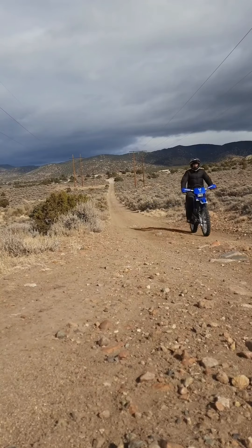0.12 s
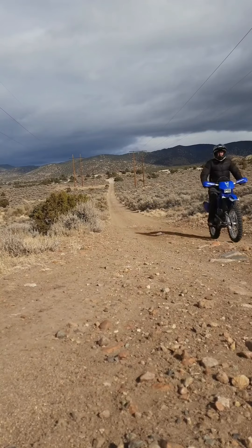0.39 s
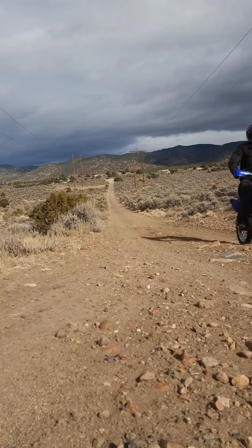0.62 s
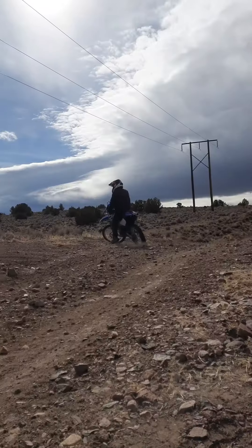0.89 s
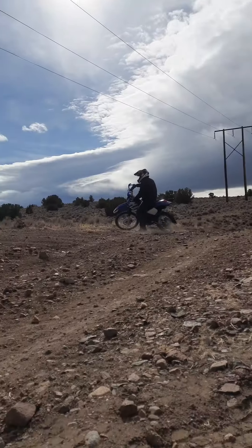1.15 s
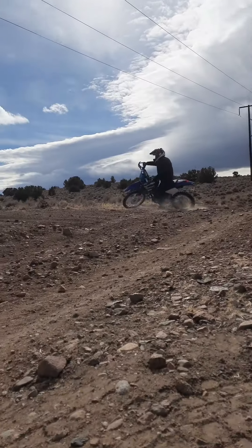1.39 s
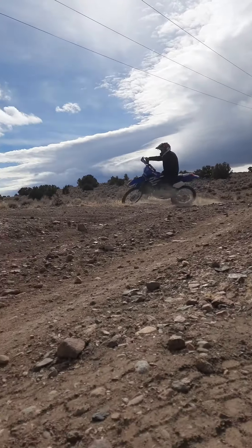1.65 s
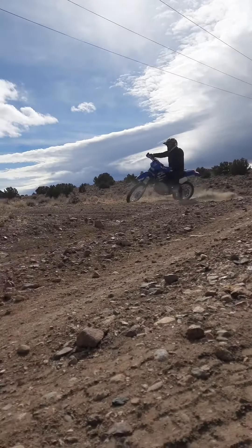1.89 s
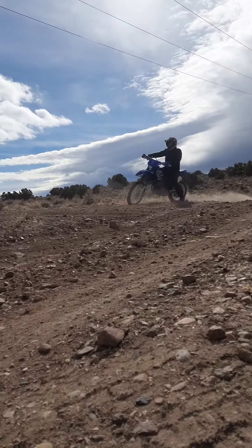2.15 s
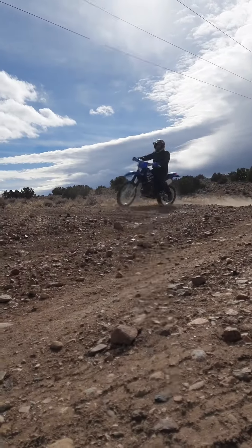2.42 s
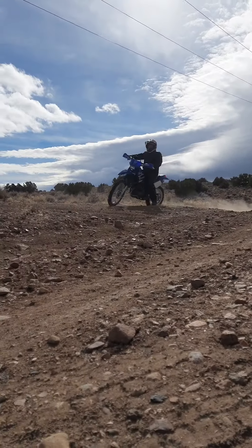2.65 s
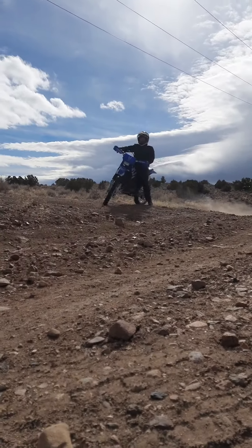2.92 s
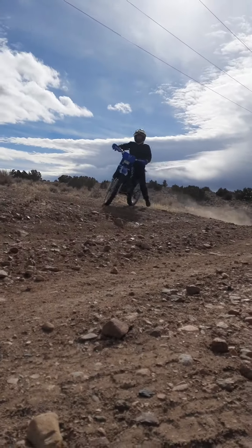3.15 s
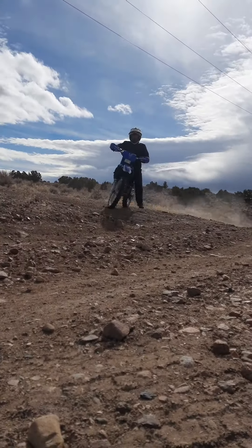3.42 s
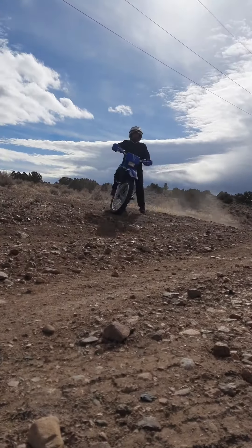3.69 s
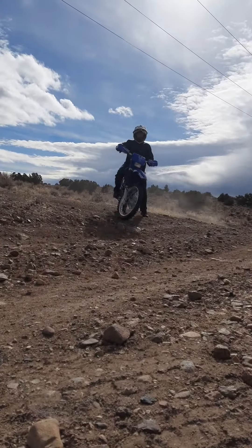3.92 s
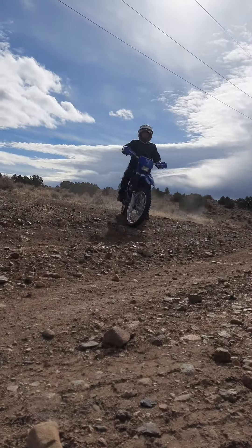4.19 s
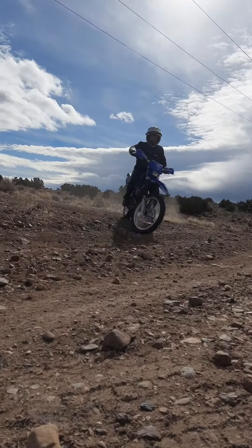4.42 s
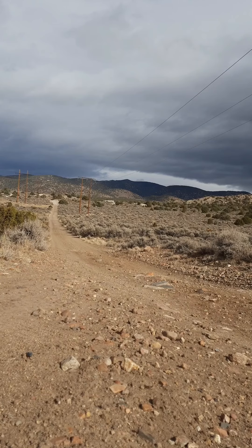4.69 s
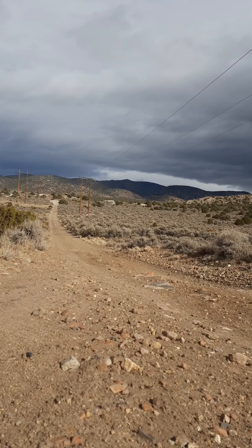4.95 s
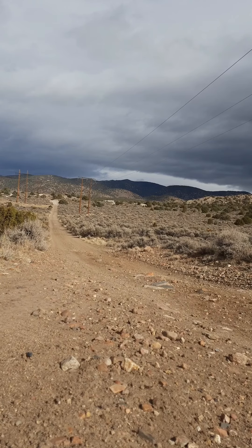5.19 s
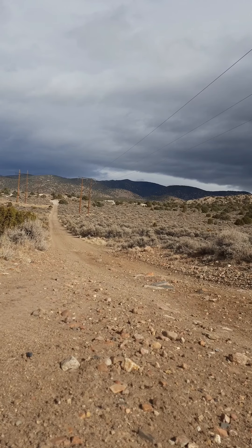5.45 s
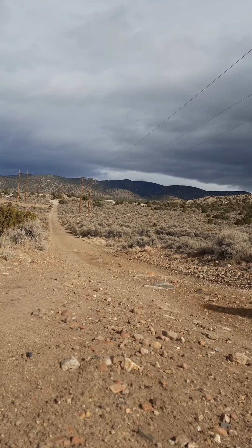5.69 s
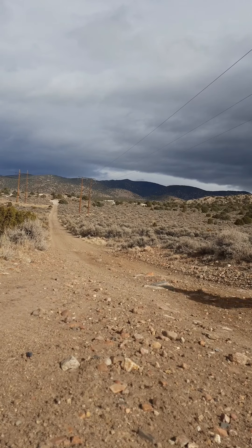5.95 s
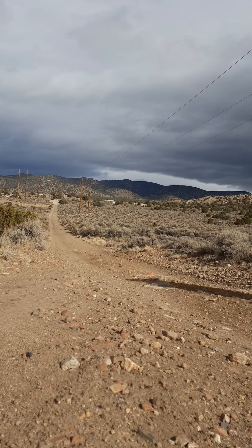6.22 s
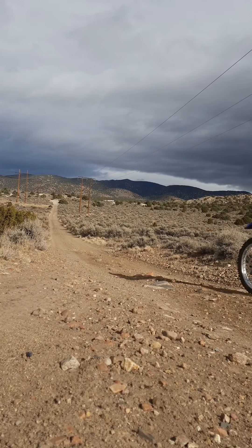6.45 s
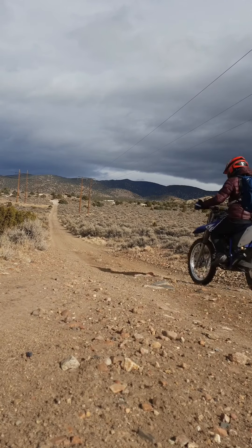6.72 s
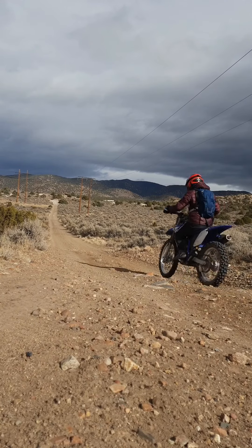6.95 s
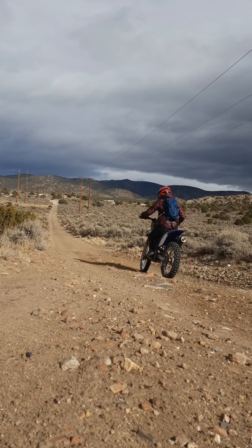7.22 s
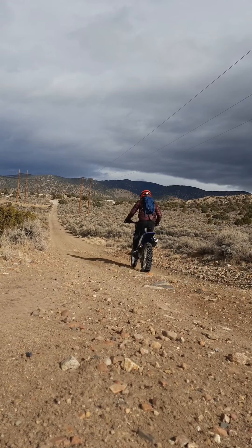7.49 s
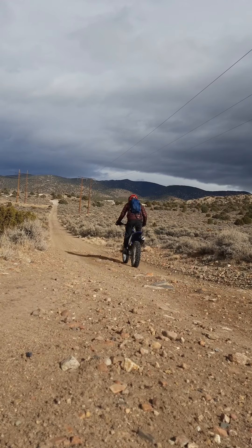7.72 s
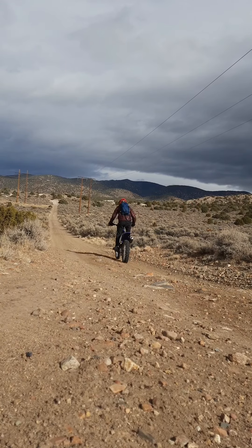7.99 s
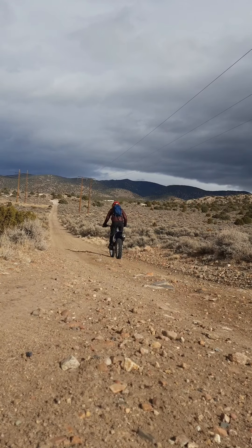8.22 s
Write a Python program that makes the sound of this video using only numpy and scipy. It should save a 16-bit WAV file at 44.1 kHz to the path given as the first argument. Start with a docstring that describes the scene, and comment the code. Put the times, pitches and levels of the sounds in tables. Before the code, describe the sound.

A single-cylinder dirt bike putters faintly, revs hard through a gravel turn, coasts in gusty wind, then chugs past close by and rides away.

```python
"""A single-cylinder four-stroke dirt bike on a gravel trail, in three shots cut together: it rolls up,
it revs round a turn and coasts, it chugs past close by and rides off. Every firing strikes the modes of
the exhaust pipe and further resonances; clatter and tyre hiss are noise swelling with the gas rush.
Chain and brake squeak in thin tones; gusts, lumpy low noise, buffet the two microphone ports."""
import sys
import numpy as np
from scipy import signal
from scipy.fft import rfft, irfft
from scipy.io import wavfile
from scipy.ndimage import uniform_filter1d, map_coordinates

SR = 44100
rng = np.random.default_rng(int(sys.argv[2]) if len(sys.argv) > 2 else 0)


def how_loud(loudness_db):
    """Turn decibels into a plain amplitude multiplier (0 dB gives 1, 20 dB gives 10)."""
    steps = np.asarray(loudness_db, float) / 20
    return 10 ** steps


def unload_audio(sound):
    """Save the sound as a 16-bit wav file, at the path given as the first command line argument."""
    columns = np.transpose(np.atleast_2d(sound))
    # keep every value between -1 and 1, then stretch to whole-number steps
    steps = np.round(np.clip(columns, -1, 1) * 32767)
    wavfile.write(sys.argv[1], SR, steps.astype(np.int16))


N = 368543
T = np.arange(N) / SR


def evened(x):
    """Scales to rms 1."""
    return x / np.sqrt(np.mean(x ** 2) + 1e-20)


def smoothed(x, samples):
    """Two running means, one after the other."""
    return uniform_filter1d(uniform_filter1d(x, samples), samples)


def curve(rows, t=T):
    """Joins rows (s, values) by straight lines."""
    s, *columns = np.transpose(rows)
    return np.squeeze([np.interp(t, s, c) for c in columns])


def coloured(x, gain):
    """Filters x by gain(hz)."""
    hz = np.fft.rfftfreq(x.shape[-1], 1 / SR) + 1
    return irfft(rfft(x) * gain(hz), x.shape[-1])


def ring(hz, t60):
    """One dying mode, of energy 1."""
    t = T[:SR // 5]
    mode = how_loud(-60 * t / t60) * np.sin(2 * np.pi * hz * t)
    return mode / np.linalg.norm(mode)


def ringing(x, hz, t60):
    """A dying mode of energy 1 whose pitch may move, struck by x."""
    turn = np.exp(2j * np.pi * np.cumsum(hz) / SR)
    r = 1000 ** (-1 / (t60 * SR))
    return np.sqrt(2 * (1 - r ** 2)) * (turn * signal.lfilter([1], [1, -r], x / turn)).imag


def delayed(x, samples):
    """Reads x a changing number of samples late."""
    return map_coordinates(x, [np.arange(len(x)) - samples], order=3, mode="nearest")


# Bike level as it nears and leaves, before ground and ports, a table a shot: time_s, exhaust_db, clatter_db
BIKE_LEVEL = [
    [(0, -48, -49.5), (.55, -40, -42.5), (.79, -41.5, -38.5)],
    [(.79, -27.5, -45.5), (1.12, -27, -46), (1.45, -28.5, -44), (1.75, -23, -40.5), (2.26, -27.5, -40),
     (2.32, -35.5, -39), (2.4, -24, -41), (2.51, -29, -42.5), (2.72, -25.5, -44.5), (2.98, -32, -46.5),
     (3.4, -38, -52.5), (4.07, -37, -53.5), (4.24, -37, -42.5), (4.36, -30, -50.5), (4.54, -53, -49)],
    [(4.54, -33, -50.5), (4.98, -29, -47), (5.06, -23.5, -41), (5.8, -23.5, -41.5), (6.47, -19, -36.5),
     (6.7, -28.5, -40.5), (6.95, -25, -41), (7.3, -26.5, -44), (7.5, -37.5, -47), (8.36, -47, -50)],
]
# Engine speed, one table a shot: time_s, firings_per_s
ENGINE_SPEED = [
    [(0, 24.3), (.79, 24.3)],
    [(.79, 21.92), (.97, 23.51), (1.2, 24.34), (1.5, 31.35), (1.75, 34.74), (2, 35.07), (2.26, 33.02),
     (3, 27.87), (4.54, 27)],
    [(4.54, 20.07), (4.6, 19.4), (4.9, 16.21), (5.1, 19.37), (5.75, 21.79), (6.2, 24.79), (6.47, 27.41),
     (6.75, 25.01), (7.05, 23.86), (7.4, 24.45), (8.36, 23.6)],
]
# One firing in each shot, from which the others are counted: time_s
A_FIRING_S = [.561, 1.078, 5.145]
# Exhaust modes, a row a shot: boom_t60_s, boom_lag_s (after the firing), bark_hz, bark_t60_s,
# echo_s (along the pipe), echo_share
PIPE_MODES = [(0.22, 0.00375, 430, 0.02, 0.0113, 0.19), (0.1, 0.00382, 239, 0.012, 0.0108, 0.44),
              (0.086, 0.00787, 293.4, 0.034, 0.00855, 0.99)]
# Clatter colour, relative, one table a shot: pitch_hz, gain_db
CLATTER_COLOUR = [
    [(520, 22), (1000, 4), (2500, -5.5), (6000, -6), (9500, -16)],
    [(550, 22), (1050, -0.5), (2500, 0.5), (6300, -3.5), (8300, -17), (10000, -12.5), (11500, -15)],
    [(520, 16.5), (1500, -3.5), (2400, -9), (3900, -13), (6600, -14), (8000, -13), (9300, -25),
     (10000, -51)],
]
BARK_DB = (2.5, -5.5, -7.5)  # the pipe's bark against its boom, throttle open, at mean level: one a shot


def bike():
    """The three shots end to end: exhaust, and engine noise in three unrelated strands."""
    exhaust, engine = np.zeros(N), np.zeros((3, N))
    for shot in zip(BIKE_LEVEL, ENGINE_SPEED, A_FIRING_S, PIPE_MODES, CLATTER_COLOUR, BARK_DB):
        first, low, high = bike_shot(*shot)
        exhaust[first:first + len(low)] = low
        engine[:, first:first + len(low)] = high
    return exhaust, engine


def bike_shot(levels, speed, firing_s, pipe, colour, bark_db):
    """Each firing strikes the pipe and lets out gas; returns first sample, exhaust, engine noise."""
    first = round(speed[0][0] * SR)
    t = T[first:round(speed[-1][0] * SR)]
    rate = curve(speed, t)
    boom_db, clatter_db = curve(levels, t)
    shut = 1 - throttle(t)
    turns, luck, strength, blows = firings(t, rate, shut, firing_s)
    exhaust = exhaust_pipe(t, blows, boom_db, bark_db, shut, luck, pipe)
    rush = gas_rush(t, turns, rate, strength, luck, shut)
    exhaust += rings_and_gas_bands(t, blows, rush, clatter_db, shut, luck)
    return first, exhaust, clatter_and_tyres(t, rush, clatter_db, colour)


# The throttle is held open: start_s, end_s
THROTTLE_OPEN = [(.82, 2.3), (4.54, 6.6), (6.92, 7.42)]


def throttle(t):
    """Opening of the throttle, 0 shut to 1 open, with a short ramp for the twist of the grip."""
    twist_s = .06  # time to open or shut it
    return sum(np.clip(np.minimum(t - start, end - t) / twist_s + .5, 0, 1) for start, end in THROTTLE_OPEN)


# Firings much stronger or weaker than their neighbours: time_s (within the cycle), strength_db
ODD_FIRINGS = [(5.835, 1.5), (5.885, -8.5), (6.72, 4), (6.76, -4), (6.795, 7), (7.755, 10)]


def firings(t, rate, shut, firing_s):
    """Counts firings from the engine speed; with the throttle shut they stumble and differ more."""
    uneven_open_db, uneven_shut_db = 1.9, 5
    stumble = .13  # scale of the wander of the firing moment when shut (cycles)
    turns = np.cumsum(rate) / SR
    turns -= np.interp(firing_s, t, turns)
    turns += stumble * shut * evened(smoothed(rng.standard_normal(len(t)), 2000))
    cycle = np.floor(turns - np.floor(turns[0])).astype(int)
    luck = np.clip(rng.standard_normal((200, 3)), -2, 2)[cycle]  # three draws a firing
    spread = np.interp(shut, (0, 1), (uneven_open_db, uneven_shut_db))
    strength = how_loud(spread * luck[:, 0] - .1 * spread ** 2)  # mean power stays about the same
    for s, db in ODD_FIRINGS:
        if t[0] < s < t[-1]:
            strength[cycle == cycle[round((s - t[0]) * SR)]] = how_loud(db)
    blows = np.diff(cycle, prepend=cycle[0]) * strength * np.sqrt(SR / rate)
    return turns, luck, strength, blows


# The pipe's boom mode shifts with the heat and flow of the gas: time_s, pitch_hz
BOOM_HZ = [(1.25, 128), (1.7, 93), (2.3, 100.6), (2.75, 94), (4.55, 94), (6.5, 122), (6.65, 96.5), (7, 119),
           (7.4, 112), (7.55, 96)]


def exhaust_pipe(t, blows, boom_db, bark_db, shut, luck, pipe):
    """Each blow excites a deep boom and a higher bark, the bark echoing once along the pipe."""
    bark_shut_db = -5.5  # change of bark when shut
    bark_growth = 0.19  # dB of bark against boom per dB of level over the mean
    boom_t60, lag_s, bark_hz, bark_t60, echo_s, echo = pipe
    bark_db = boom_db + bark_db + bark_shut_db * shut + bark_growth * (boom_db - boom_db.mean())
    bark = np.convolve(ring(bark_hz, bark_t60), signal.windows.hann(round(0.0019 * SR)))
    bark = bark + echo * delayed(bark, echo_s * SR)  # the pulse runs the pipe and leaves again
    bark /= np.linalg.norm(bark)
    boom = ringing(np.roll(blows, round(lag_s * SR)) * how_loud(boom_db), curve(BOOM_HZ, t), boom_t60)
    return boom - signal.oaconvolve(blows * how_loud(bark_db + 0.5 * luck[:, 1]), bark)[:len(t)]


# How each firing shows in the engine noise, as weights: time_s, gas_rush, crack (short, from the pipe's
# mouth), valve_puff (just before)
PULSE = [(.8, 1, 0.88, 0.11), (1.4, 0.95, 1.1, .1), (1.7, 0.35, 0.048, 0.2), (4.5, 0.54, 0.077, 0.33),
         (5.2, 0.86, 0.2, 0.65), (6.45, 0.24, 1.18, 0.058), (7.3, 0.29, 0.42, 0.037)]


def gas_rush(t, turns, rate, strength, luck, shut):
    """Envelope of the gas: a rush and a short crack at each firing, a valve puff before it."""
    rush_shut = .5  # share of the rush left when shut
    crack_lag_s, crack_s, puff_lead_s = 0.0015, 0.0041, 0.013
    since_firing_s = (turns % 1) / rate
    since_click_s = ((turns + .5) % 1) / rate  # valves click half a cycle after the firing
    rush = strength ** .7 * np.exp(-since_firing_s / .017) + .3 * np.exp(-since_click_s / .008)
    # fast firings blur into one another
    rush = uniform_filter1d(rush, 240) * (1 - (1 - rush_shut) * shut) * 24 / rate
    burst = strength * how_loud(2.5 * luck[:, 2]) * np.exp(-since_firing_s / crack_s)
    burst = uniform_filter1d(burst, 90) * (1 - shut)
    gas, crack, puff = np.clip(curve(PULSE, t), 0, 5)
    late_crack = np.roll(burst, round(crack_lag_s * SR))
    early_puff = np.roll(rush, -round(puff_lead_s * SR))
    return gas * rush + crack * late_crack + puff * early_puff


# Ringing metal and pipe; also a broad band of gas noise whose top edge climbs as the ground echo
# shortens (the row from 2.2 s): start_s, end_s, level_db (over clatter),
# t60_s (of each of two like modes), lag_s, blow_share (blow against gas)
RESONANCES = [(0.9, 2.2, -13, 0.026, -0.0043, 1.93), (4.97, 5.82, -15, 0.0078, .004, 0.51),
              (5.02, 8.26, -15, 0.0035, .003, 0.5), (4.95, 5.8, 9, 0.033, .004, 1),
              (2.2, 4.62, -6, 0.00097, 0.004, 0.044), (4.85, 7.35, 3.5, 0.019, .008, 1.02),
              (6.76, 7.64, 7.5, 0.044, .002, 1.82), (1.61, 2.27, 0.5, 0.00077, -0.018, .1),
              (7.1, 8.5, -10.5, 0.00084, 0.0075, 1.1), (1.65, 2.05, -3.5, 0.067, .001, 0.85),
              (0.31, 3.2, -11, 0.0025, .001, 0.43), (1.26, 2.35, -1.5, 0.022, .004, 1),
              (5.36, 6.3, 9.5, 0.026, .006, 0.83)]
# Pitch of each resonance, about which firings vary: first_hz, last_hz
RESONANCE_HZ = [(1230, 1360), (1600, 1450), (2200, 2200), (350, 350), (6400, 9200), (490, 400), (290, 280),
                (5600, 6200), (7500, 7500), (760, 775), (1700, 2150), (300, 390), (280, 205)]


def rings_and_gas_bands(t, blows, rush, clatter_db, shut, luck):
    """Resonances driven by blow and gas, sliding in pitch: long ones ring, short ones are broad bands."""
    out = np.zeros(len(t))
    knock = blows * how_loud(2 * luck[:, 2] - 9 * shut)
    rasp = (.15 + 3.5 * rush) * rng.standard_normal(len(t))
    for (start, end, db, t60, lag, blow), (first_hz, last_hz) in zip(RESONANCES, RESONANCE_HZ):
        on = (t > start) & (t < end + t60)
        along = np.clip((t[on] - start) / (end - start), 0, 1)
        hz = first_hz + (last_hz - first_hz) * along + 9 * luck[on, 1]  # firings differ a little in pitch
        gas_share = min(first_hz / 1500, 1)  # gas hardly shakes the deep rings
        driven = np.roll(blow * knock + gas_share * rasp, round(lag * SR))[on]
        driven = driven * np.abs(np.sin(np.pi * along)) ** .5 * how_loud(clatter_db[on] + db)
        # rung through a second like mode: a softer start
        rung = ringing(ringing(driven, hz, t60), hz, t60)
        out[on] += rung * np.sqrt(2 * np.log(1000) / (t60 * SR))
    return out


# Level of the airy top of the engine noise: time_s, level_db (against the clatter)
AIR_LEVEL = [(.79, -39), (.8, -38), (1.95, -5), (2.4, -30), (4.05, -22), (4.18, -6.5), (4.3, -12),
             (5.9, -14.5), (6.8, -10.5), (8.36, -12.5)]


def clatter_and_tyres(t, rush, clatter_db, colour):
    """Coloured noise under the gas rush; its gritty steady part is the tyres' hiss on gravel."""
    grit = how_loud(1.84 * evened(uniform_filter1d(rng.standard_normal(len(t)), 150)))
    noise = rng.standard_normal((2, 3, len(t))) * grit
    f, db = np.transpose(colour)

    def clatter_gain(hz):
        return how_loud(np.interp(np.log(hz), np.log(f), db)) / (1 + (f[0] / hz) ** 4)

    clatter = coloured(noise[0] * (1 + 1.63 * rush), clatter_gain)
    air = coloured(noise[1] * (1 + 4 * rush), lambda hz: (hz / 9000) ** -.8 / (1 + (8300 / hz) ** 7))
    air_db = clatter_db + curve(AIR_LEVEL, t)
    return how_loud(clatter_db) * evened(clatter) + how_loud(air_db) * evened(air)


# Echoes off the ground, shrinking as the path flattens: time_s, main_delay_s, strength (factor)
GROUND_ECHO = [(.8, .00088, 1), (3, .00072, 1.1), (4.2, .00058, .8), (4.6, .0007, .3)]
# Lag of the left port behind the right, less for the top: time_s, lag_samples
LEFT_LATE = [(0, 1), (.78, 1), (.8, -1.5), (2, -3), (4.53, -2), (4.55, 4.5), (7.1, 3)]


def trail():
    """The bike with its ground echoes, reaching the two ports a few samples apart."""
    exhaust, engine = bike()
    # the exhaust carries little deep bass below about 70 Hz
    exhaust = signal.sosfilt(signal.butter(2, 70, "high", fs=SR, output="sos"), exhaust)
    echo_s, strength = curve(GROUND_ECHO)
    paths = [(1, .5), (2.3, .45), (4.1, .35)]  # (share of the main delay, gain)
    echoes = sum(gain * delayed(engine[0], share * echo_s * SR) for share, gain in paths)
    near = exhaust + .7 * (engine[0] + strength * echoes)
    # off stones and scrub, unrelated in the two ports
    scattered = coloured(engine[1:], lambda hz: 0.45 + 0.58 * np.clip(hz / 4500, 0, 1))
    top = coloured(near, lambda hz: 1 / (1 + (3000 / hz) ** 6))
    late = curve(LEFT_LATE) / 2
    # short waves reach the ports closer together
    ports = [delayed(near - top, side * late) + delayed(top, 0.58 * side * late) for side in (1, -1)]
    # the exhaust also returns from one side, opposed in the ports
    slope = .25 * np.roll(exhaust, round(.0024 * SR))
    return np.array(ports) + np.outer([1, -1], slope) + scattered


# Brief thin tones: start_s, level_db, pitch_hz (at the start, before wavering), length_s
SQUEAKS = [(0.903, -35.5, 5330, 0.009), (3.456, -56, 7950, 0.03), (3.452, -54, 14300, .03),
           (3.75, -57, 12300, .04), (4.168, -47, 13700, 0.047)]


def squeaks():
    """Chain and brake squeak: short sines that waver and sink in pitch."""
    out = np.zeros(N)
    for s, db, hz, length in SQUEAKS:
        t = T[:round(length * SR)]
        waver = 1 + .03 * uniform_filter1d(rng.standard_normal(4000), 60)[:len(t)] - 0.29 * t
        tone = np.sin(2 * np.pi * hz * np.cumsum(waver) / SR)
        out[round(s * SR):][:len(t)] += how_loud(db) * signal.windows.tukey(len(t), .5) * tone
    return out


# Low buffeting at the ports, before gusts and side: time_s, level_db
WIND_LEVEL = [(0, -30), (.5, -48.5), (.95, -33), (1.5, -32), (2.1, -38), (3.4, -35), (4.45, -39), (5, -37),
              (5.66, -29), (6.4, -32), (6.75, -28.5), (7.1, -40), (7.7, -37), (8.36, -29.5)]
# Balance of the buffeting between the ports: time_s, left_minus_right_db
WIND_SIDE = [(2.8, 0), (3.2, -7), (4.4, -4), (4.7, 0), (7.5, 0), (7.85, -5)]
# Deep rumble of the wind, about which its lumps move: time_s, level_db
WIND_RUMBLE = [(.8, -43), (1.1, -24.5), (2.5, -31), (4.7, -49)]
# Single hard knocks of wind, a little weaker left than right: start_s, peak_db (midway between ports)
WIND_KNOCKS = [(3.573, -20.5), (3.597, -22.5), (4.023, -24), (8.028, -23), (8.06, -18), (8.195, -12),
               (8.235, -10)]


def wind():
    """Lumps of turbulence in noise unrelated in the two ports, brighter in gusts, with hard knocks."""
    calm_top_hz, lift = 378, 0.095  # top edge of the buffeting; octaves it rises per dB of gust
    frames = dict(nperseg=1024, noverlap=768)
    fast, slow = rng.standard_normal((2, 2, N))
    lumps = 4.3 * evened(smoothed(fast, 300))  # dB
    lumps += 2.2 * evened(smoothed(slow.mean(0), 1800))  # slow lumps reach both ports
    hz, t, z = signal.stft(rng.standard_normal((2, N)) * how_loud(np.minimum(lumps, 7)), SR, **frames)
    hz = hz[:, None] + 1
    top_hz = calm_top_hz * 2 ** (lift * gusting(t))
    shape = (hz / 100) ** -.3 / (1 + (70 / hz) ** 2) / (1 + (hz / top_hz) ** 3.8)
    shape /= np.linalg.norm(shape, axis=0)
    gusts = evened(signal.istft(z * shape, SR, **frames)[1][:, :N])
    gusts *= how_loud(curve(WIND_LEVEL) + gusting(T) + np.outer([.5, -.5], curve(WIND_SIDE)))
    rumble = evened(coloured(rng.standard_normal((2, N)), lambda hz: 1 / (1 + (hz / 70) ** 4)))
    gusts += how_loud(curve(WIND_RUMBLE) + .5 * lumps) * rumble
    knock = np.convolve(ring(437, 0.022), signal.windows.hann(48))
    for s, db in WIND_KNOCKS:
        part = gusts[:, round(s * SR):][:, :len(knock)]
        part += how_loud(db) * np.outer([.85, 1.15], knock / knock.max())[:, :part.shape[1]]
    return gusts


# Gusts on top of the buffeting: middle_s, length_s, rise_db
GUSTS = [(0.635, 0.71, 5), (3.73, 0.21, 5.5), (3.957, 0.41, 4.5), (4.16, 0.11, 7.5), (4.256, 0.15, 7.5),
         (7.864, 0.16, 7.5), (8.063, 0.33, 7), (8.224, 0.24, 10.5)]


def gusting(t):
    """Rise of the wind in dB: each gust swells and dies."""
    rises = [db * np.cos(np.pi * np.clip((t - s) / length, -.5, .5)) for s, length, db in GUSTS]
    return np.max(rises, axis=0)


def scene():
    """Bike on the trail, squeaks and wind, at the two ports."""
    return trail() + squeaks() + wind()


def band_limit(x):
    """A steep low-pass at the top of the band."""
    return signal.sosfilt(signal.butter(12, 15980, fs=SR, output="sos"), x)


def record(dry):
    """Deep bass is rolled off; nothing is left above about 15.5 kHz."""
    mix = coloured(dry, lambda hz: 1 / (1 + (hz / 15500) ** 80))
    mix = signal.sosfilt(signal.butter(2, 52, "high", fs=SR, output="sos"), mix)
    return band_limit(mix)


dry = scene()
out = record(dry)
unload_audio(out)
```